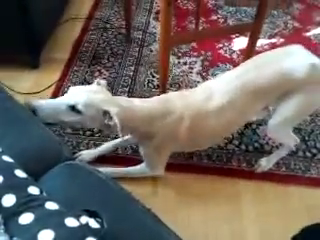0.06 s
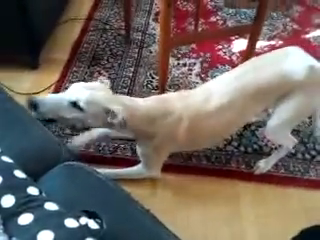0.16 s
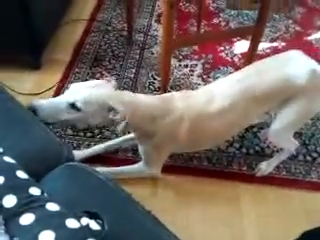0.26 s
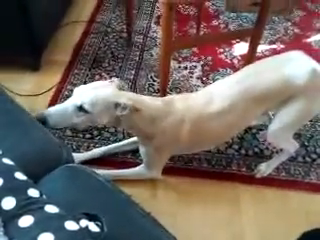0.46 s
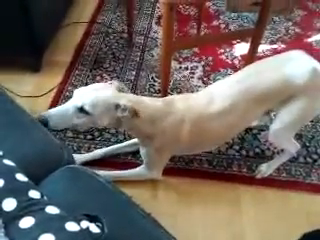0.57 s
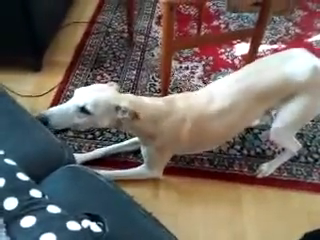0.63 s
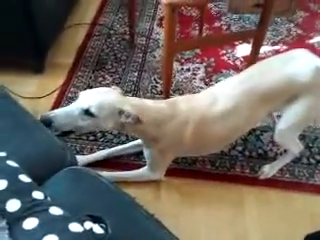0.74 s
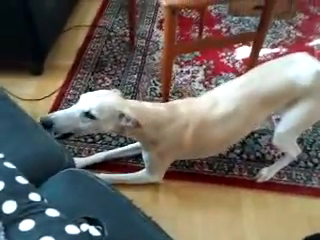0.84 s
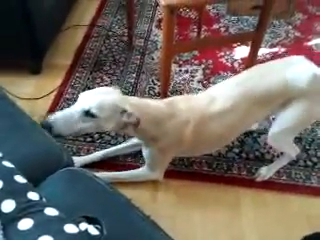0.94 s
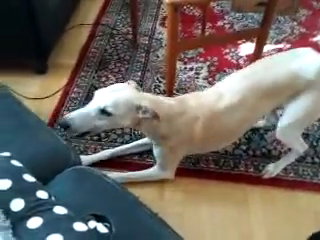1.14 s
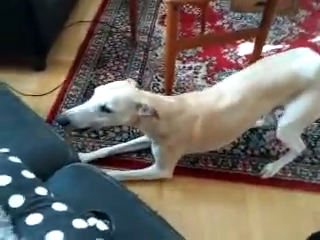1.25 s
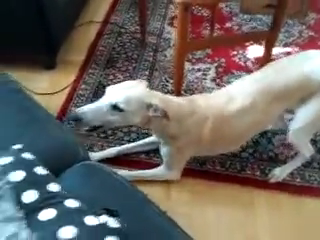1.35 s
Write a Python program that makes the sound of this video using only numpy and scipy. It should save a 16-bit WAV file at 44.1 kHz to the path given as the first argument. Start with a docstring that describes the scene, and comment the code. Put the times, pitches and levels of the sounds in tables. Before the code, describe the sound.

Two short, playful dog barks ring briefly in a room, slightly distorted.

```python
"""A dog gives two playful barks in a living room, close to a small microphone.
Each bark is an arch of pitch: hoarse at the start, clear at the top, breaking into a rasp as it drops.
Vocal fold pulses and puffs of air make the voice; the throat and the opening mouth shape it.
The dog draws air before each bark and shuffles on the rug with soft footfalls.
The room rings, and the barks overload the microphone."""
import sys
import numpy as np
from scipy import signal
from scipy.fft import rfft, irfft
from scipy.io import wavfile

SR = 44100
rng = np.random.default_rng(int(sys.argv[2]) if len(sys.argv) > 2 else 0)


def log_audio(samples):
    """Write samples as a 16-bit WAV file to the path given in sys.argv[1]."""
    # one column per channel
    frames = np.atleast_2d(samples).T
    # limit to full scale, then quantise
    limited = np.clip(frames, -1, 1)
    pcm = np.round(limited * 32767).astype(np.int16)
    wavfile.write(sys.argv[1], SR, pcm)


N = 61739
TIME = np.arange(N) / SR


def amp(db):
    """Decibels to gain."""
    return 10 ** (np.asarray(db) / 20)


def unit(x):
    """Scales to an rms of one."""
    return x / np.sqrt(np.mean(x ** 2) + 1e-20)


def read(points, hz):
    """Reads a curve on a log-frequency axis."""
    point_hz, value = np.transpose(points)
    return np.interp(np.log(hz + 1), np.log(point_hz + 1), value)


def colour(x, points, shift=1):
    """Minimum-phase EQ with the given curve, moved in frequency by a ratio."""
    hz = abs(np.fft.fftfreq(8192, 1 / SR))
    log_gain = np.log(amp(read(points, hz / shift)))
    taps = np.fft.ifft(np.exp(np.conj(signal.hilbert(log_gain)))).real[:4096]
    return signal.fftconvolve(x, taps)[:len(x)]


def wobble(rate_hz):
    """Smooth random motion around a rate."""
    ratio = np.fft.rfftfreq(N, 1 / SR) / rate_hz
    return unit(irfft(rfft(rng.standard_normal(N)) * ratio * np.exp(-ratio ** 2), N))


def hiss(swells, tone):
    """Coloured noise that swells and dies away."""
    level = sum(amp(db) * np.interp(TIME, [start, peak, end], [0, 1, 0])
                for start, peak, end, db in swells)
    return level * unit(colour(rng.standard_normal(N), tone))


def room_tone():
    """A faint, steady bed of dark noise."""
    # The tone of the bed. Each row: frequency in Hz, gain in dB.
    bed_tone = [(25, -14.5), (70, -5), (200, -21.5), (500, -11.5), (1500, -23.5), (4000, -18.5),
                (8000, -61)]
    return amp(-58.5) * unit(colour(rng.standard_normal(N), bed_tone))


def paw_scuffs():
    """Pads brush the wool rug with a low rustle."""
    # The brush stroke. Each row: start, peak and end in seconds, level in dB.
    strokes = [(-0.17, 0.053, 0.66, -50.5)]
    # The tone of pads on wool. Each row: frequency in Hz, gain in dB.
    rug_tone = [(30, -12), (120, 7.5), (320, 12), (700, -10.5), (1500, -36.5), (3500, -19), (5500, -14),
                (8500, -16.5)]
    return hiss(strokes, rug_tone)


def gasps():
    """Air hisses in through the mouth before each bark."""
    # The breaths. Each row: start, peak and end in seconds, level in dB.
    breaths = [(-.08, .015, .17, -50.5), (.68, .82, 0.95, -49.5), (.85, .873, 0.905, -49.5)]
    # The mouth's resonances on the breath. Each row: frequency in Hz, gain in dB.
    breath_tone = [(200, -3.5), (450, -22.5), (700, 5), (950, -22), (1250, -3.5), (1550, -2), (2000, 0),
                   (2600, 1), (3200, -6.5), (3900, -3), (5000, -28), (6200, -25), (7300, -13),
                   (9000, -20.5)]
    return hiss(breaths, breath_tone)


def footfalls():
    """Each footfall gives the floor a short, dull push."""
    # The paw landings. Each row: start in seconds, level in dB, pitch in Hz.
    landings = [(.005, -45, 70.5), (0.202, -42, 140), (0.221, -29, 135.5), (0.369, -40.5, 204),
                (.43, -49, 211), (1.084, -48, 144)]
    ramp_s, decay_s = 0.0017, 0.0059
    thuds = np.zeros(N)
    for start, db, hz in landings:
        age = np.maximum(TIME - start, 0)
        thuds += amp(db) * (age / ramp_s) * np.exp(-age / decay_s) * np.sin(2 * np.pi * hz * age)
    return thuds


def vocal_folds(pitch_hz, rough):
    """The folds pulse unsteadily and pass a puff of air each cycle; roughness trades tone for air."""
    # The bright tone of the puffs. Each row: frequency in Hz, gain in dB.
    puff_tone = [(200, -4), (700, 1), (2000, 6), (5000, 14)]
    jitter, shimmer, wobble_hz = .032, .15, 238
    lag_turns, puff_decay_cycles = .08, 0.68
    hz = pitch_hz * (1 + jitter * np.sqrt(rough) * wobble(wobble_hz))
    turns = np.cumsum(hz) / SR
    # Higher overtones lag further, which smears each pulse.
    pulses = sum(np.cos(2 * np.pi * (k * turns - lag_turns * (k / 2) ** 2)) for k in range(1, 25))
    pulses *= 2 * np.sqrt(hz / SR)
    pulses *= 1 + shimmer * wobble(wobble_hz)
    puff_shape = np.exp(-(turns % 1) / puff_decay_cycles)
    puffs = colour(unit(puff_shape * rng.standard_normal(N)), puff_tone)
    return np.sqrt(1 - rough) * pulses + np.sqrt(rough) * puffs


def throat(voice, mouth, shift):
    """Throat and mouth resonate, moved by the ratio shift: first the lips part, then the jaw drops."""
    # The tone with lips closed, mouth nearly shut and wide open. Each row: frequency in Hz, gain in dB.
    closed_lips = [(300, 17), (600, 4.5), (1400, -6), (2500, -17.5), (7000, 1.5)]
    nearly_shut = [(120, -47), (280, -27), (400, -13.5), (490, -1.5), (570, 2.5), (645, 4.5), (780, 1),
                   (930, -18.5), (1150, -7), (1350, -3), (1650, -14.5), (2100, -0.5), (2350, -4),
                   (2600, -6), (2900, -8.5), (4000, -34), (9000, -82.5)]
    wide_open = [(120, -55), (280, -41), (375, -13.5), (480, -27), (645, -14.5), (780, -6), (930, -27),
                 (1110, -1), (1210, 0.5), (1320, -10), (1650, -13), (1900, -5), (2100, -4.5), (2320, 0),
                 (2620, -8), (2900, -12.5), (4000, -20), (4900, -38), (6500, -31), (9000, -35)]
    parted_at = .3  # mouth opening at which the lips stop muffling
    parted = np.clip(mouth / parted_at, 0, 1)
    voice = parted * voice + colour((1 - parted) * voice, closed_lips)
    jaw = np.pi / 2 * np.clip((mouth - parted_at) / (1 - parted_at), 0, 1)
    return colour(voice * np.cos(jaw), nearly_shut, shift) + colour(voice * np.sin(jaw), wide_open, shift)


def bark(gesture, throat_shift):
    """The folds sound through the throat as pitch, effort and mouth rise and fall."""
    times, pitch_hz, effort_db, rough, mouth = np.transpose(gesture)
    rough = np.clip(np.interp(TIME, times, rough), .02, .95)
    effort = amp(np.interp(TIME, times, effort_db, left=-200, right=-200))
    voice = effort * vocal_folds(np.interp(TIME, times, pitch_hz), rough)
    return throat(voice, np.interp(TIME, times, mouth), throat_shift)


def two_barks():
    """The dog barks twice, reaching a little higher the second time."""
    # The voice through each bark. Each row: time in seconds, pitch in Hz, effort in dB,
    # roughness from 0 to 1, mouth opening from 0 to 1.
    first = [(.217, 262, -23, 0.22, 0.04), (.233, 278.4, -7.5, 0.22, 0.04), (.244, 283.3, -4, .15, 0.11),
             (.253, 297.6, -3, 0.2, 0.5), (.278, 323.3, 7, .03, 0.46), (.289, 355.9, 3, 0.17, 0.62),
             (.302, 382.6, 4.5, .03, 0.96), (.338, 373.4, -1.5, 0.11, 0.89), (.349, 281.4, -6.5, 0, 0.38),
             (.374, 272.2, -6, 0.31, 0.47), (.384, 218, -55, .4, .4)]
    second = [(.908, 205, -17, .08, 0.78), (.921, 250.5, -5.5, 0.059, 0.34),
              (.934, 273.5, -1.5, 0.12, 0.32), (.946, 320, 1.5, 0.095, 0.6),
              (.958, 330.3, -3.5, 0.18, 0.53), (.969, 377, 3, 0.13, 0.56), (.987, 395.2, 2, 0.049, 0.93),
              (1.010, 406.1, 5.5, 0.025, 0.79), (1.015, 293.1, 0.5, 0.026, 0.34),
              (1.034, 282.8, -1.5, 0.16, 0.49), (1.046, 224, -22, 0.55, 0.23)]
    return amp(-2.5) * (bark(first, throat_shift=0.96) + bark(second, throat_shift=0.971))


def living_room(x):
    """Quick reflections from floor and furniture, then a tail in which each band dies at its own speed."""
    # Bounces off floor, sofa, chair and wall. Each row: delay in seconds, level in dB.
    bounces = [(.0017, -20), (.0046, -22), (.0077, -12), (.0124, -17)]
    # The ring time. Each row: frequency in Hz, seconds to fall by 60 dB.
    ring_times = [(150, 0.57), (500, .5), (900, 0.3848), (1300, 0.6075), (2200, 0.7955), (3800, .5),
                  (7000, 0.62)]
    # The tone of the tail. Each row: frequency in Hz, gain in dB.
    tail_tone = [(150, 3.1), (600, 2.7), (1200, -1), (2200, -1.02), (4000, 2.2), (7000, 1)]
    early_db, early_decay_s, echoes_per_s = -10, 0.015, 2000
    tail_db, tail_rise_s = -8.5, 0.017
    t = np.arange(SR) / SR
    early = rng.standard_normal(SR) * (rng.random(SR) < echoes_per_s / SR)
    early *= np.exp(-t / early_decay_s) * (t > .002)
    hz, age, bands = signal.stft(rng.standard_normal(SR), SR, nperseg=256)
    bands *= amp(-60 * age / read(ring_times, hz)[:, None])
    tail = signal.istft(bands, SR, nperseg=256)[1][:SR] * np.minimum(t / tail_rise_s, 1) ** 2
    echoes = amp(early_db) * early / np.linalg.norm(early)
    echoes += amp(tail_db) * colour(tail / np.linalg.norm(tail), tail_tone)
    echoes += sum(amp(db) * np.sinc((t - delay) * SR) for delay, db in bounces)
    return x + signal.fftconvolve(x, echoes)[:N]


def gain_control(x):
    """Ducks the loudest moments by a share of their excess, then recovers slowly."""
    threshold_db, share, smoothing_s, recover_db_per_s = -14, 0.49, 0.011, 18.5
    pole = np.exp(-1 / (smoothing_s * SR))
    level_db = 10 * np.log10(signal.lfilter([1 - pole], [1, -pole], x ** 2) + 1e-12)
    duck_db = share * np.maximum(level_db - threshold_db, 0)
    recovery_db = recover_db_per_s * TIME
    return x / amp(np.maximum.accumulate(duck_db + recovery_db) - recovery_db)


def scene():
    """Barks and footfalls ring in the room; breath and scuffs stay dry over the room tone."""
    barks, bed = two_barks(), room_tone()
    return (living_room(barks + footfalls()) + gasps() + paw_scuffs() + bed)[None]


def record(dry):
    """Gain control ducks the barks, the remaining peaks clip unevenly, and the treble rolls off."""
    # The small microphone's tone. Each row: frequency in Hz, gain in dB.
    mic_tone = [(20, -13.5), (80, -9.5), (3000, -1.5), (5500, 0.5), (7000, -5.5), (8000, -13),
                (9000, -34.5)]
    overload_db, lopsided, hardness, cutoff_hz = -11.3, .1, 24, 9000
    ducked = gain_control(dry[0])
    ceiling = amp(overload_db) * (1 + lopsided * np.sign(ducked))
    clipped = ducked / (1 + abs(ducked / ceiling) ** hardness) ** (1 / hardness)
    low_pass = signal.firwin(401, cutoff_hz, window=("kaiser", 9), fs=SR)
    return signal.fftconvolve(colour(clipped, mic_tone), low_pass, "same")[None]


dry = scene()
out = record(dry)
log_audio(out)
```